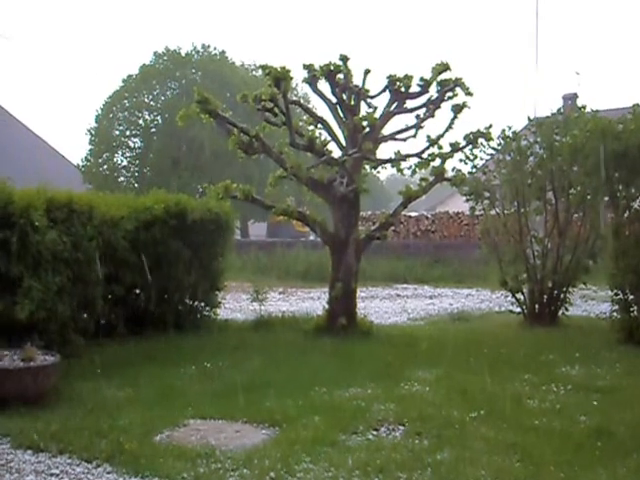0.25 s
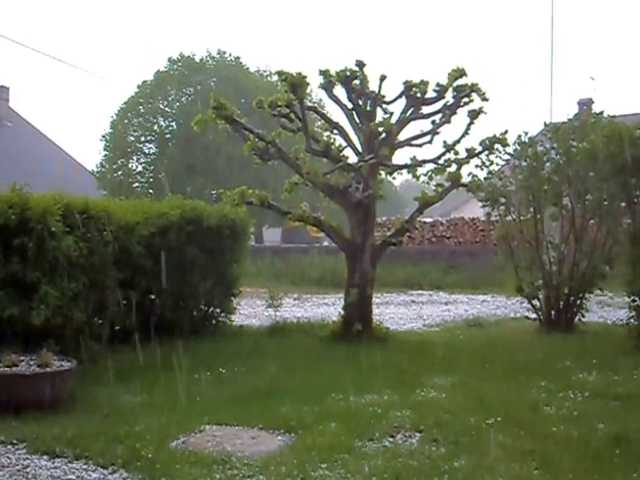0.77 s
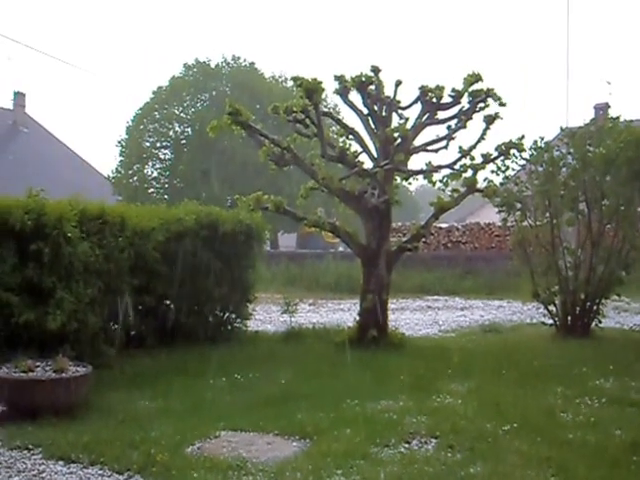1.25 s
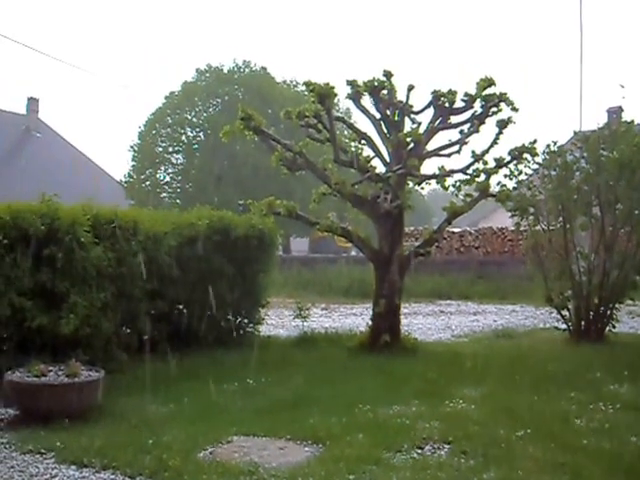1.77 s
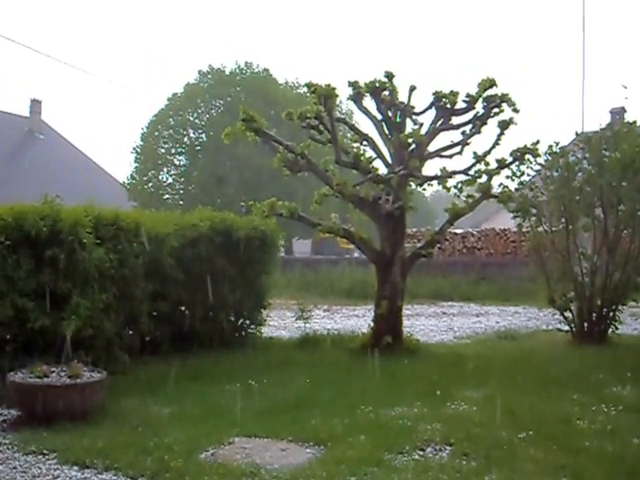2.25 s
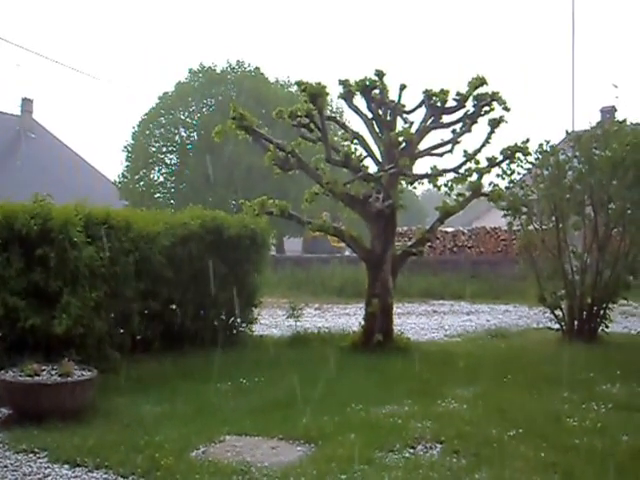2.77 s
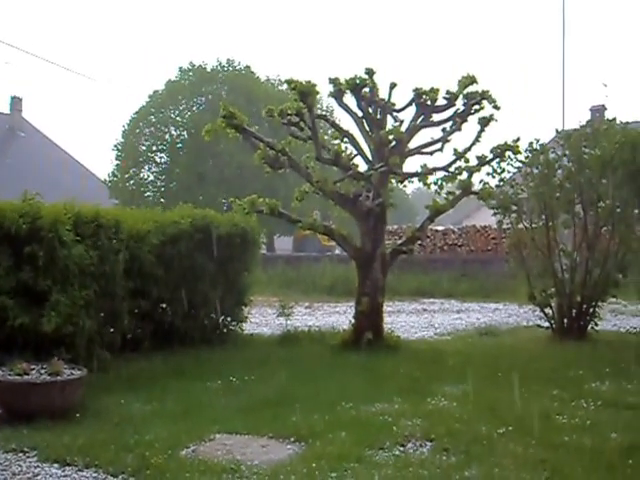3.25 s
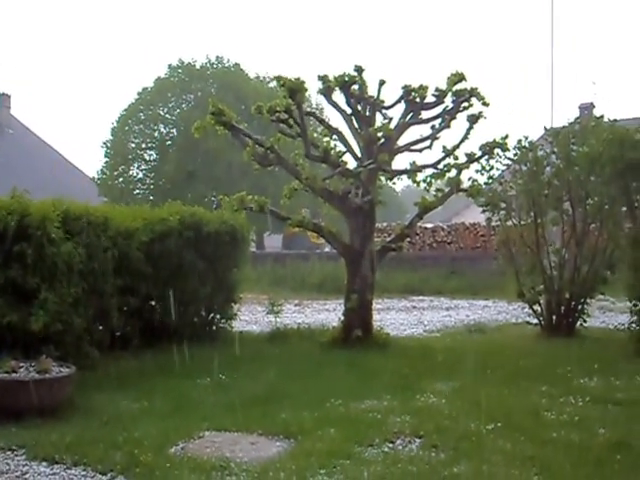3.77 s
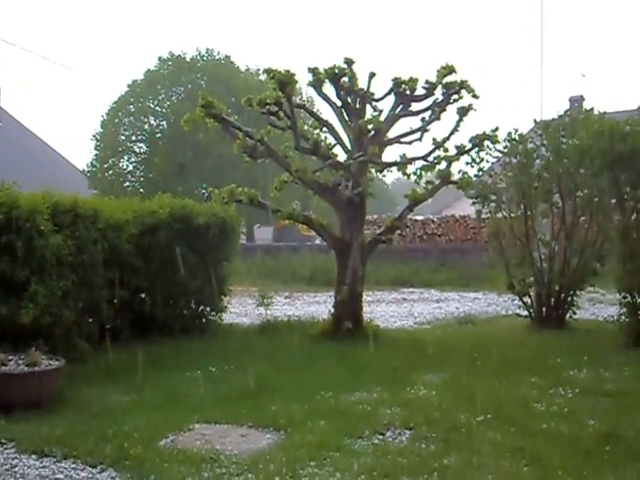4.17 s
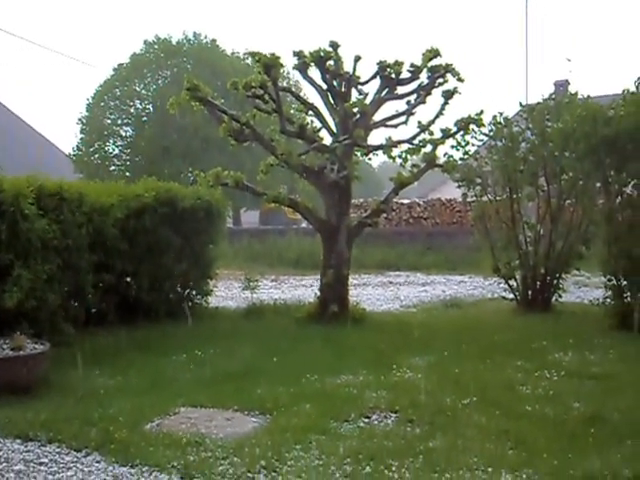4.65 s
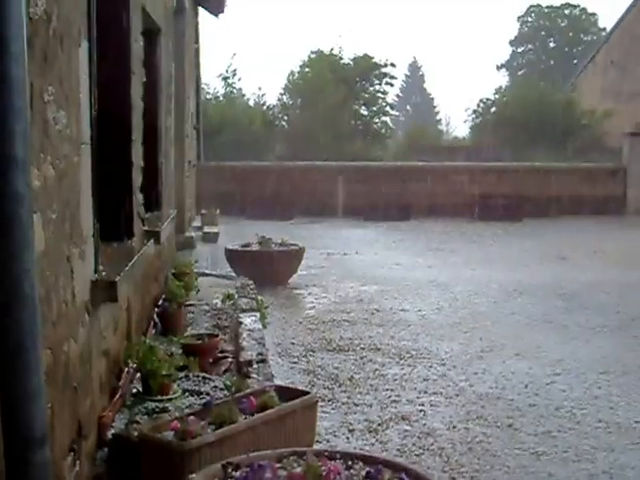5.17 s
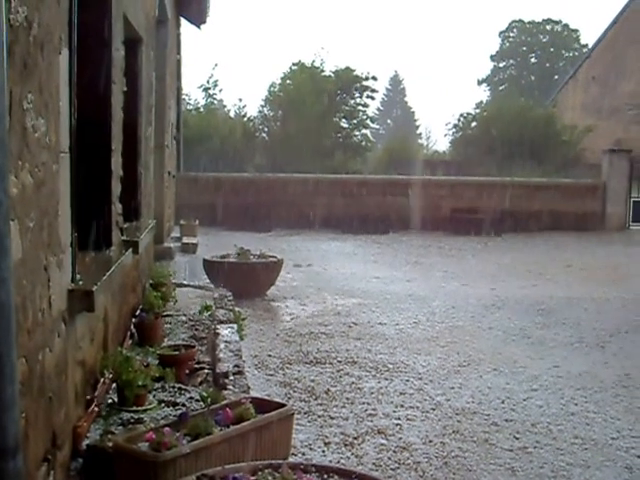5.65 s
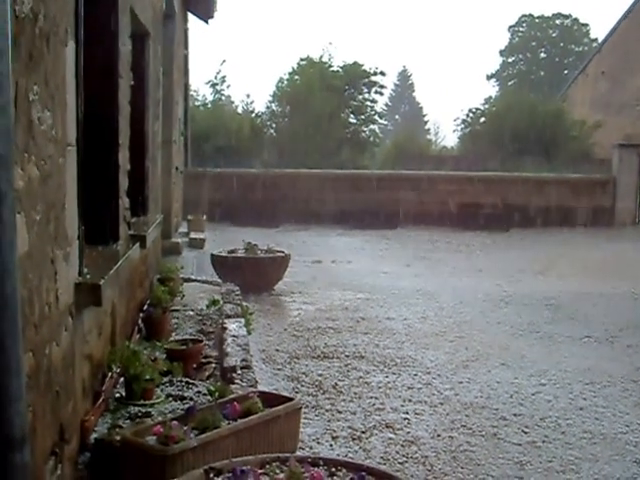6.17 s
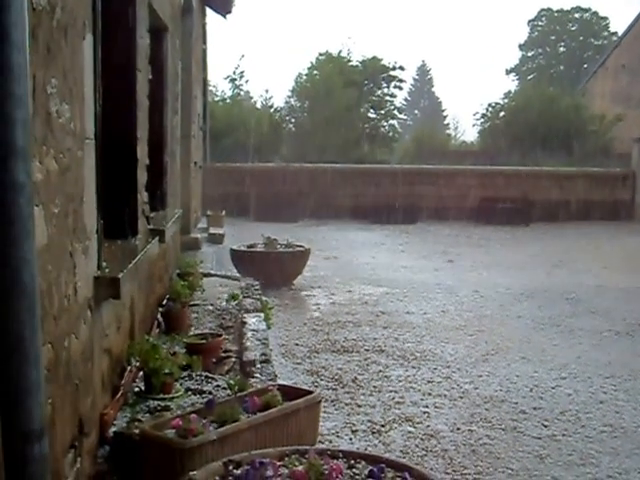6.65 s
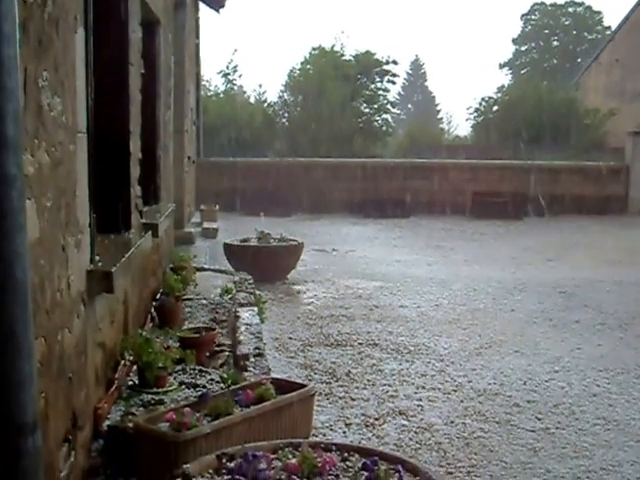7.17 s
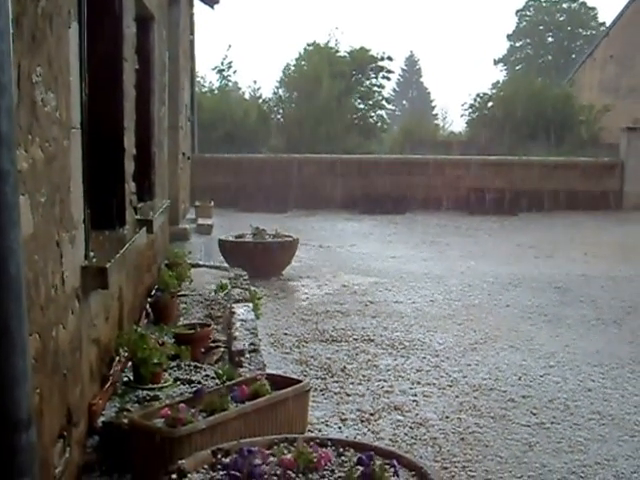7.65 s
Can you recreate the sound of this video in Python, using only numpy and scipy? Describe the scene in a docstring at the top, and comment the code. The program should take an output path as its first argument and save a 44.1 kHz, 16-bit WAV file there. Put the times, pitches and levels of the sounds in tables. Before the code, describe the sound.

Hail and rain pour steadily on a garden lawn and gravel path: a dense mid-toned rush with dull knocks, fine ticks, small pings and scattered close cracks and thuds. A dull low drone swells and fades. After about five seconds there is a quarter second of silence, then louder, crisper pelting on a wet gravel yard. Small mono microphone, boxy, with no extreme treble.

```python
"""Hail and rain pelt a lawn with a gravel path and, after a short silent gap, a wet gravel yard by a house.
The nearest stones are noise bursts that excite damped resonances: a crack, a thud and a clatter of chips.
Smaller impacts are random clicks, ringing in narrow bands or snapping; countless far ones merge into noise.
Behind them lies a low rumble of filtered noise; a dull drone swells and fades during the garden stretch.
One small mono microphone hears it all through the resonances of its housing."""
import sys
import numpy as np
from scipy import signal
from scipy.fft import rfft, irfft
from scipy.io import wavfile

SR = 44100
rng = np.random.default_rng(int(sys.argv[2]) if len(sys.argv) > 2 else 0)


def wav_record(signal):
    """Record a signal, one row per channel, as 16-bit PCM in the file named by sys.argv[1]."""
    frames = np.transpose(np.atleast_2d(signal))
    bounded = np.clip(frames, -1, 1)
    # unit amplitude maps onto the largest positive 16-bit level
    quanta = np.round(bounded * 32767).astype(np.int16)
    wavfile.write(sys.argv[1], SR, quanta)


N = 348390
TIME = np.arange(N) / SR   # s
GARDEN_END_S, YARD_START_S = 4.903, 5.1425   # silence lies between


def from_db(db):
    """Logarithmic level: decibels become an amplitude ratio."""
    return 10 ** (np.asarray(db) / 20)


def rms_one(x):
    """Power normalisation: scale a signal to a root mean square of one."""
    return x / np.sqrt(np.mean(x ** 2) + 1e-20)


def drift(corner_hz):
    """Low-pass noise: two equal poles leave a slow random curve with unit rms."""
    step, settling = 40, 2000   # samples between points of the curve; points dropped at the start
    pole = np.exp(-2 * np.pi * corner_hz * step / SR)
    noise = rng.standard_normal(N // step + settling + 2)
    slow = signal.lfilter([1], [1, -2 * pole, pole * pole], noise)[settling:]
    return np.interp(np.arange(N) / step, np.arange(len(slow)), rms_one(slow))


def resonate(x, hz, q):
    """Damped resonance: a second-order band-pass with unit gain at its peak."""
    w = 2 * np.pi * min(hz, SR / 2 - 1000) / SR
    damp = np.sin(w) / (2 * q)
    return signal.lfilter([damp, 0, -damp], [1 + damp, -2 * np.cos(w), 1 - damp], x + 1e-18)


def colour(x, spectrum):
    """Minimum-phase filtering: a folded cepstrum gives a causal response; white noise keeps its power."""
    size = 8192
    hz, db = np.transpose(spectrum)
    grid = np.maximum(np.arange(size // 2 + 1) * SR / size, 1)
    curve_db = np.interp(np.log(grid), np.log(hz), db)
    cepstrum = irfft(np.log(from_db(curve_db)))
    response = irfft(np.exp(rfft(2 * cepstrum[:size // 2], size)))
    response = response / np.linalg.norm(response)
    return signal.fftconvolve(x, response)[:N]


def impacts(per_s, spread_db, size):
    """Poisson-like arrivals: clicks of random sign at random moments, many small and a few large."""
    chance = per_s / SR
    luck = rng.random(size)
    born = luck < chance
    rarity = -np.log((luck / chance)[born] + 1e-9)   # exponentially distributed
    clicks = np.zeros(size)
    clicks[born] = from_db(abs(spread_db) * np.minimum(rarity, 4))
    signs = 2 * rng.integers(2, size=size, dtype=np.int8) - 1
    return clicks * signs


def near_stones(stones, q, thud_hz, thud_q, crack_db, crack_t60, chips_per_s, chip_spread_db, rattle_db):
    """Impact excitation: a noise crack and decaying chips drive a pitched resonance and a low thud."""
    clatter_hold = 0.021     # share of t60 before the clatter starts to decay
    clatter_attack = 0.0072  # time constant of its build-up, as a share of t60
    rattle_onset_s = 0.023   # time until its unevenness has grown to full depth
    out, size = np.zeros(N + SR), SR // 3
    age, rattle = np.arange(size) / SR, drift(45)
    for start_s, db, hz, thud_db, t60 in stones:
        at = max(round(start_s * SR), 0)
        crack = from_db(crack_db - 60 * age / crack_t60) * rng.standard_normal(size)
        chips = rms_one(impacts(chips_per_s, chip_spread_db, size))
        unevenness = np.minimum(age / rattle_onset_s, 1) * np.roll(rattle, -at)[:size]
        decay_db = 60 * np.maximum(age / t60 - clatter_hold, 0)
        rise = 1 - np.exp(-age / (clatter_attack * t60))
        clatter = rise * from_db(rattle_db * unevenness - decay_db) * chips
        force = crack + clatter
        # resonating twice steepens the slopes on both sides of the thud
        thud = resonate(resonate(force, thud_hz, thud_q), thud_hz, thud_q)
        out[at:at + size] += from_db(db) * resonate(force, hz, q) + from_db(thud_db) * thud
    return out[:N]


def lesser_stones(count):
    """Stratified chance: one stone at random in each equal time slot; harder cracks clatter more briefly."""
    # middle values, then the greatest departures from them
    crack_db, thud_db, pitch_hz, clatter_t60_s = 6.5, -10, 5600, 0.031
    spread_db, pitch_octaves, t60_octaves = 1.5, .6, 1.5
    stones = []
    for k, (when, hard, pitch, thud) in enumerate(rng.uniform(-1, 1, (count, 4))):
        stones.append((
            (k + (when + 1) / 2) / count * N / SR,
            crack_db + spread_db * hard,
            pitch_hz * 2 ** (pitch_octaves * pitch),
            thud_db + 2 * spread_db * thud,
            clatter_t60_s * 2 ** (-t60_octaves * hard)))
    return stones


def pings(faint_db, spread_db, t60, count):
    """Free decay: a stone on something hard rings as a dying sine; faint ones come at random."""
    # Stones that ring on something hard.
    # Each row: start in seconds, pitch in Hz, level in dB before the shower's gain and colouring.
    clear_pings = [(0.495, 2410, 1), (1.160, 5270, 4), (1.161, 4800, -1), (1.494, 2860, -2),
                   (1.507, 2330, -2), (1.830, 2540, -1), (2.655, 5210, 0), (3.044, 3730, 0.5),
                   (4.448, 3010, 6.5), (4.615, 5300, 2), (5.848, 4760, -3)]
    faint = [(when * N / SR, 1700 * 3.4 ** pitch, faint_db + spread_db * (force - .5))
             for when, pitch, force in rng.random((count, 3))]
    out, age = np.zeros(N + SR), np.arange(SR // 5) / SR
    for start_s, hz, db in list(clear_pings) + faint:
        at = round(start_s * SR)
        out[at:at + len(age)] += from_db(db - 60 * age / t60) * np.sin(2 * np.pi * hz * age)
    return out[:N]


def patter(low_hz, high_hz, per_s, spread_db, q, scatter, scatter_t60, count):
    """Band resonance: in each pitch band stones ring for a few cycles and scatter decaying grit noise."""
    out = np.zeros(N)
    fade = from_db(-120 / (scatter_t60 * SR))   # per sample, for energy: 60 dB down after t60
    for hz in np.geomspace(low_hz, high_hz, count):
        clicks = rms_one(impacts(per_s / count, spread_db, N))
        grit_energy = signal.lfilter([1 - fade], [1, -fade], clicks ** 2 + 1e-18)
        grit = scatter * np.sqrt(grit_energy) * rng.standard_normal(N)
        out += resonate(clicks + grit, hz, q)
    return rms_one(out)


def ticks(per_s, spread_db, low_hz):
    """High-passed impulses: small stones and drops snap on hard ground, in loose flurries."""
    clicks = impacts(per_s * from_db(2.5 * drift(11.0)), spread_db, N)
    high_pass = signal.butter(2, low_hz, "high", fs=SR, output="sos")
    return rms_one(signal.sosfilt(high_pass, clicks))


def wash(flutter_db):
    """Superposition: countless far impacts merge into noise whose level flutters slightly."""
    return rms_one(rng.standard_normal(N) * from_db(flutter_db * drift(24)))


def garden():
    """Sum of impact textures: dull knocks on turf and leaves, pebbles and fine ticks from the path."""
    knocks = patter(307, 2290, per_s=620, spread_db=0.0, q=4.8, scatter=1.0, scatter_t60=0.061, count=12)
    pebbles = patter(2230, 9500, per_s=380, spread_db=4.5, q=7.3, scatter=0.73, scatter_t60=0.017, count=10)
    snaps = ticks(per_s=2100, spread_db=1.5, low_hz=2570)
    far = from_db(-0.5) * wash(flutter_db=0.58)
    return far + from_db(-13.5) * knocks + from_db(-14.5) * pebbles + from_db(-13) * snaps


def yard():
    """Sum of impact textures: splats in standing water, pebbles and stronger ticks on bare gravel."""
    splats = patter(309, 2360, per_s=680, spread_db=3.5, q=4.2, scatter=0.57, scatter_t60=0.057, count=12)
    pebbles = patter(2770, 10800, per_s=700, spread_db=2.0, q=12.0, scatter=1.0, scatter_t60=0.013, count=10)
    snaps = ticks(per_s=950, spread_db=2.3, low_hz=2400)
    far = from_db(-0.5) * wash(flutter_db=0.26)
    return far + from_db(-15.5) * splats + from_db(-14.0) * pebbles + from_db(-5.0) * snaps


def shower(start_s, db, ease_db_per_s):
    """Amplitude modulation: the fall eases slowly, wavers by chance and thickens or thins in flurries."""
    # Flurries and lulls of the hail.
    # Each row: time of the peak in seconds, level added there in dB.
    flurry_peaks = [(0.03, 1.5), (0.27, -2), (0.95, 1.0), (1.2, 0.5), (2.42, -0.5), (4.2, 2), (4.38, -1.0),
                    (4.76, 1.2), (5.55, 1.5), (7.88, 0.5)]
    flurry_s = .065   # time from the peak to about a third of its dB
    flurries = sum(added_db * np.exp(-((TIME - s) / flurry_s) ** 2) for s, added_db in flurry_peaks)
    waver = 0.14 * drift(3)   # dB
    return from_db(db - ease_db_per_s * (TIME - start_s) + flurries + waver)


def rumble(swell_hz, swell_q):
    """Filtered noise: a low rumble throughout, and a dull far drone that swells, holds and fades."""
    # Level of the rumble over time.
    # Each row: time in seconds, level in dB before the microphone.
    level_curve = [(0, -42.5), (4.8, -37.5), (5.2, -41.5), (7.9, -40)]
    # Spectrum of the rumble.
    # Each row: frequency in Hz, relative density in dB per Hz.
    rumble_spectrum = [(12, -25.5), (35, -0.5), (70, -2), (135, 2.5), (200, -7.5), (330, -8), (700, -24),
                       (2000, -60)]
    level_db = np.interp(TIME, *np.transpose(level_curve))
    low = from_db(level_db) * colour(rng.standard_normal(N), rumble_spectrum)

    hold_start_s, hold_end_s, hold_db = 3.22, 4.1, -37
    rise_db_per_s, fall_db_per_s = 15, 27
    drone = rms_one(resonate(resonate(rng.standard_normal(N), swell_hz, swell_q), swell_hz, swell_q))
    rising = rise_db_per_s * np.maximum(hold_start_s - TIME, 0)
    fading = fall_db_per_s * np.maximum(TIME - hold_end_s, 0)
    return low + from_db(hold_db - rising - fading) * drone


def scene():
    """Linear superposition: garden, then yard, over the rumble; the same sound in both channels."""
    # The nearest hailstones.
    # Each row: start in seconds, crack level in dB, crack pitch in Hz, thud level in dB, clatter t60 in
    # seconds; both levels are resonator gains before the shower's gain and colouring.
    nearest_stones = [(0.149, 7, 6400, -14, .15), (0.355, 15, 4200, -12, 0.015),
                      (0.386, 12.5, 2400, 9, 0.15), (0.411, 9, 1490, -4, 0.15), (0.43, 6, 4020, 0, 0.13),
                      (0.779, 4.5, 3000, -15, .2), (1.066, 9.5, 4800, 9, 0.18), (1.160, 7.5, 3000, -2, .16),
                      (1.284, 7, 4600, 8, 0.064), (1.493, 8.5, 3000, -10, .12), (1.642, 6, 3400, 3.5, 0.17),
                      (1.973, 10, 8500, -12, 0.063), (2.256, 4.5, 4000, 7, 0.14), (2.632, 7, 4700, 7, 0.2),
                      (2.739, 9, 4000, -12, 0.2), (3.041, 5, 4300, 5, 0.24), (3.596, 9.5, 2200, 8, 0.18),
                      (3.9, 11.5, 4900, -8, 0.097), (4.448, 13.5, 2300, 15, 0.14),
                      (4.656, 7, 6900, -12, 0.096), (5.218, 11.5, 6500, 0, .022), (5.235, 5, 1980, 1, .28),
                      (5.762, 11, 7460, -9, .11), (5.827, 4.5, 2400, -16, 0.24),
                      (6.247, 13, 8500, -12, .017), (6.345, 8.5, 2000, -12, 0.079),
                      (6.67, 18.5, 6200, -12, 0.013), (6.754, 6, 7300, 3, 0.07),
                      (7.435, 17, 8500, -12, 0.11), (7.457, 9.5, 8450, -9, 0.34),
                      (7.752, 7, 4600, -12, 0.3)]
    # Colour of impacts on the garden ground.
    # Each row: frequency in Hz, relative density in dB per Hz.
    garden_spectrum = [(88, -40.5), (150, -11.5), (210, -7.5), (294, -5), (322, -6), (838, -2.5),
                       (1110, -8.5), (1860, -2), (2150, -6), (3400, -10), (4210, -13), (5300, -10),
                       (6330, -16), (9190, -17), (10400, -20.5), (13500, -48.5), (22000, -120)]
    # Colour of impacts on the yard ground.
    # Each row: frequency in Hz, relative density in dB per Hz.
    yard_spectrum = [(88, -23), (150, -4), (218, -4), (631, -0.5), (740, -2), (838, -0.5), (1110, -6),
                     (1830, 0.5), (2390, -5), (3340, -7.5), (3920, -12), (5300, -10), (6220, -14.5),
                     (9690, -18), (10400, -20), (13500, -48), (22000, -120)]
    stones = list(nearest_stones) + lesser_stones(count=30)
    near = near_stones(stones, q=0.99, thud_hz=850, thud_q=0.99, crack_db=-15.5, crack_t60=.012,
                       chips_per_s=9000, chip_spread_db=1.0, rattle_db=3.0)
    near = near + pings(faint_db=-7.5, spread_db=2, t60=0.053, count=110)
    on_garden = shower(0, db=-28, ease_db_per_s=0.135) * colour(garden() + near, garden_spectrum)
    on_yard = shower(YARD_START_S, db=-25, ease_db_per_s=0.7) * colour(yard() + near, yard_spectrum)
    mono = np.where(TIME < GARDEN_END_S, on_garden, on_yard) + rumble(swell_hz=153.4, swell_q=0.81)
    return np.stack([mono, mono])


def record(dry):
    """Parallel resonance: the housing adds its modes, the gap is muted and a steep low-pass cuts the top."""
    # Resonances of the microphone housing.
    # Each row: frequency in Hz, bandwidth in Hz, peak gain of the added path in dB.
    housing_modes = [(850, 50, -19), (1380, 70, -14), (1897, 84, -16), (3395, 210, -8.5), (4740, 130, -24),
                     (5430, 180, -17), (9550, 590, -11)]
    voiced = dry + sum(from_db(db) * resonate(dry, hz, hz / width_hz) for hz, width_hz, db in housing_modes)
    running = (TIME < GARDEN_END_S) | (TIME > YARD_START_S)
    low_pass = signal.cheby2(20, 62, 11050, fs=SR, output="sos")   # 62 dB down from 11050 Hz upward
    return signal.sosfilt(low_pass, voiced * running)


dry = scene()
out = record(dry)
wav_record(out)
```